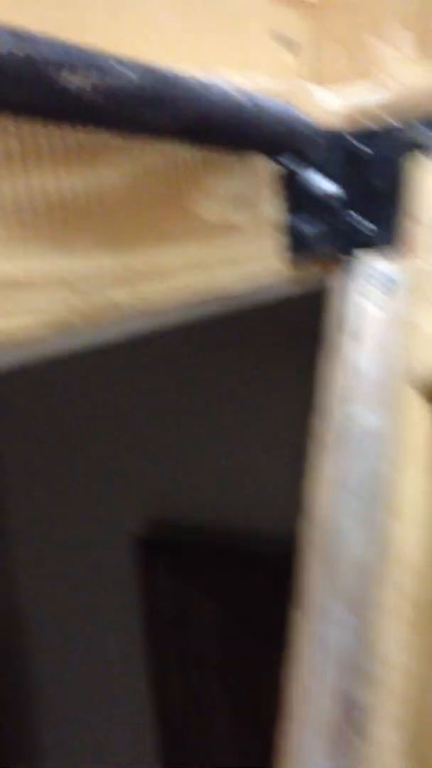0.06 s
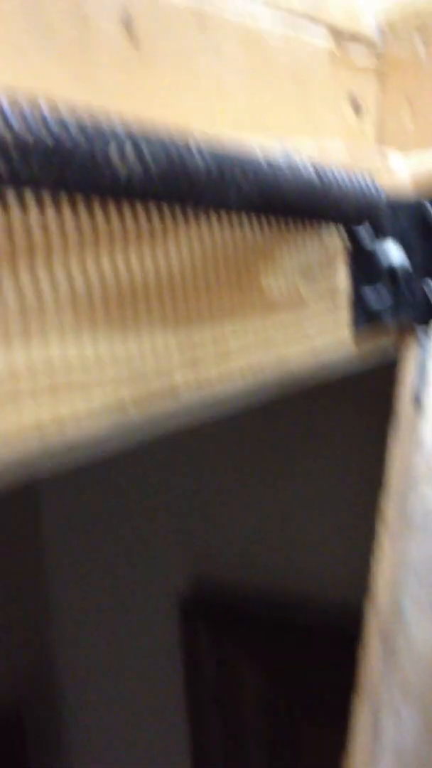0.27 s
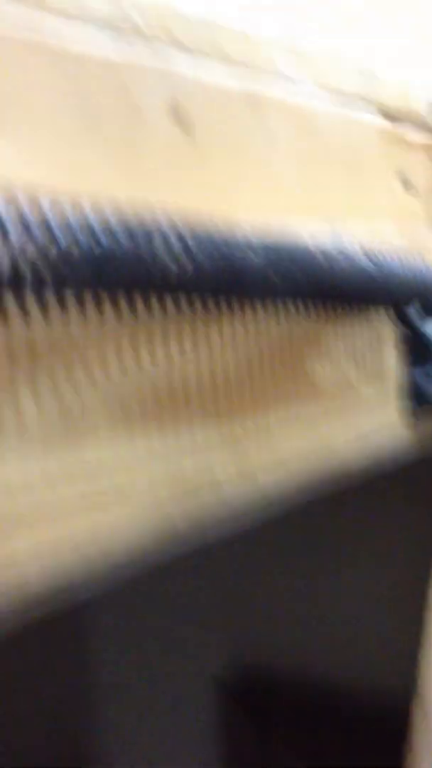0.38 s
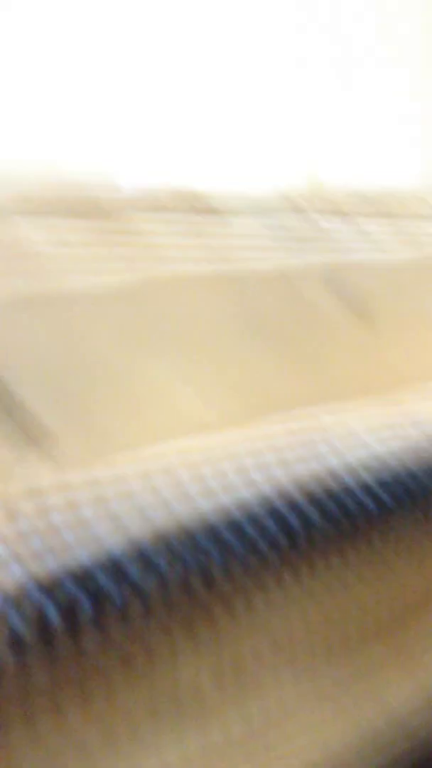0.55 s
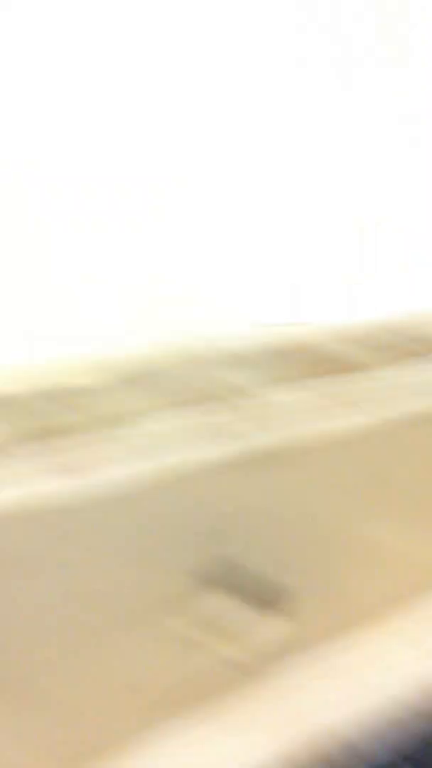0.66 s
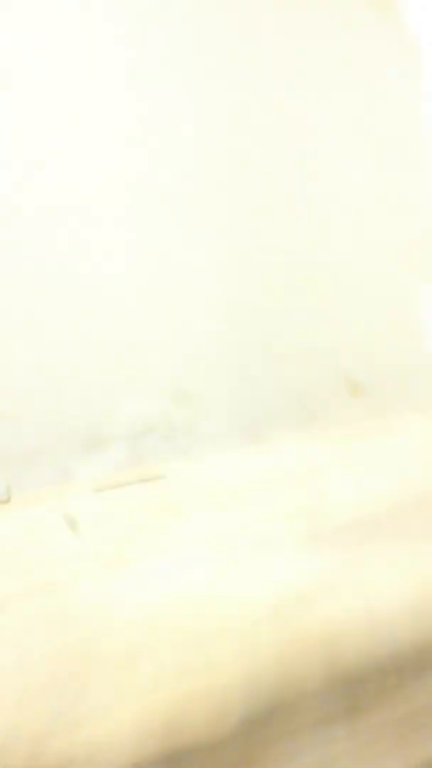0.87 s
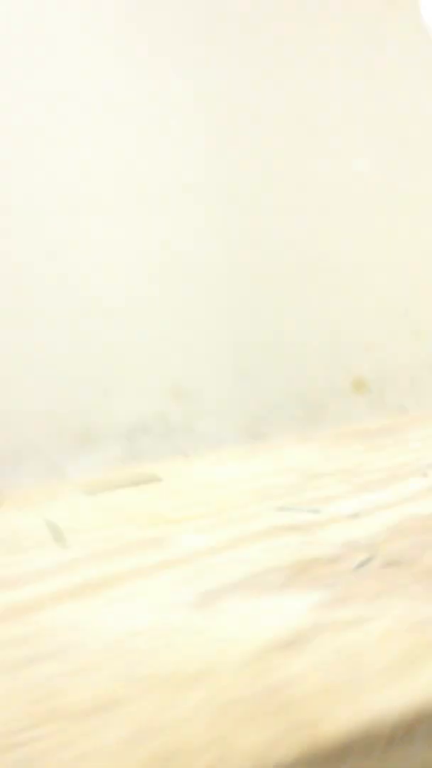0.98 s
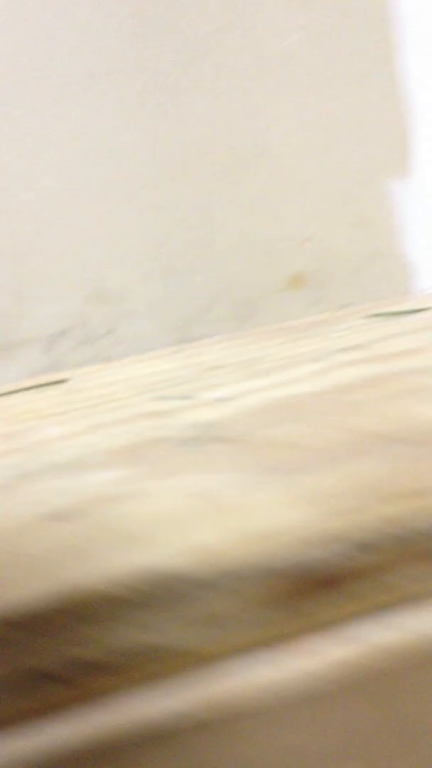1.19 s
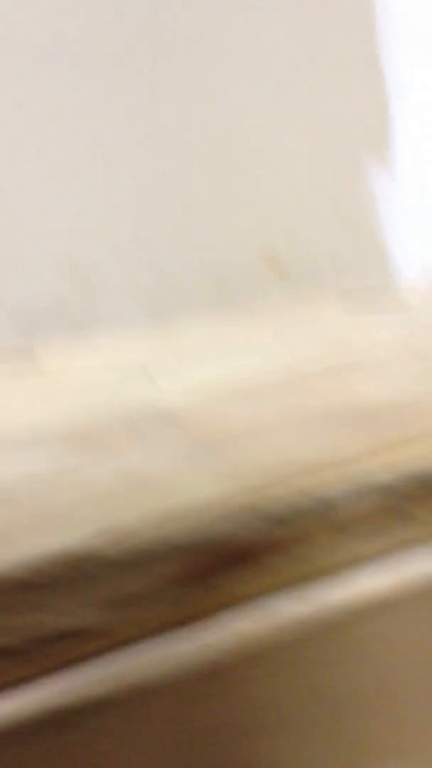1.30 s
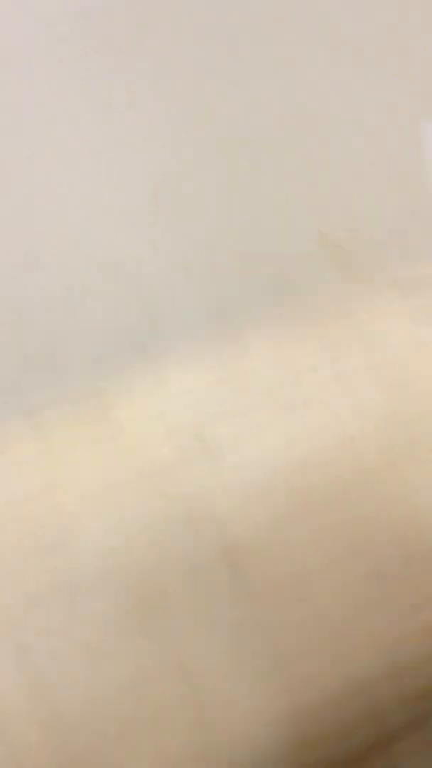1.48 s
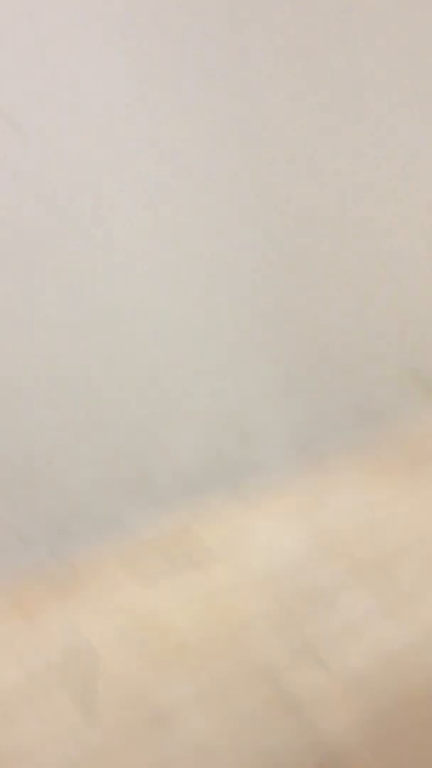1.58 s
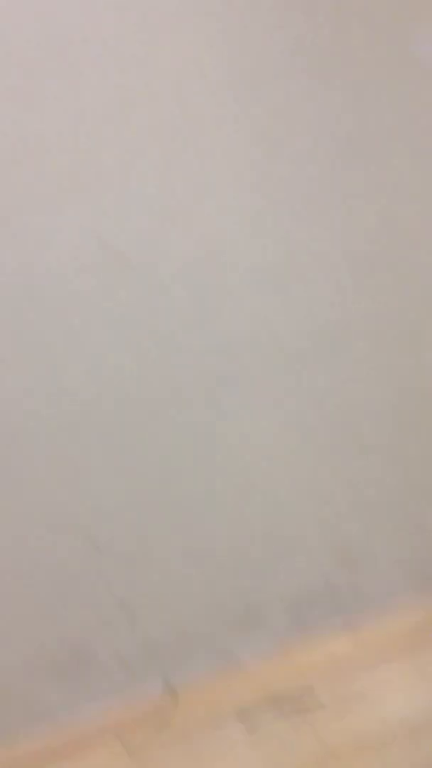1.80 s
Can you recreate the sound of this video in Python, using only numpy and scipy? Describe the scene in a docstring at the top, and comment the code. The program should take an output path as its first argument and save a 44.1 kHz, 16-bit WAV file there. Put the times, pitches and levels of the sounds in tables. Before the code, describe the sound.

A wooden door clatters close by in a small, quiet room. Dull thuds start at 0.2 seconds, then knocks and metal clicks run from 0.4 to 0.8, loudest near 0.6, where a bracket squeaks briefly. The door's coil spring rings on with a wavering metallic tone. More thuds come at 1.2 seconds, followed by softer rattling knocks until 1.5, and the spring's ring slowly fades.

```python
"""A wooden door on a long coil spring is moved twice, close by, in a small room.
Each move opens with dull thuds of the timber; then the door knocks and chatters in its frame.
Metal fittings click as they take up their play, and a bracket sings briefly as it slips.
The knocks set the spring ringing: a dense wash below 2 kHz, with clear wavering modes on top,
that hangs on between the moves."""
import sys
import numpy as np
from scipy import signal
from scipy.fft import rfft, irfft, next_fast_len
from scipy.io import wavfile

SR = 44100
rng = np.random.default_rng(int(sys.argv[2]) if len(sys.argv) > 2 else 0)


def wrap_up_sound(samples):
    """Save the sound to the file named by the first command line argument, as 16-bit audio."""
    columns = np.atleast_2d(samples).T
    # keep every value between -1 and 1, then stretch to whole-number steps
    tamed = np.clip(columns, -1, 1)
    steps = np.round(tamed * 32767).astype(np.int16)
    wavfile.write(sys.argv[1], SR, steps)


N = 81585

# colour of the room tone: (frequency [Hz], relative level [dB])
AIR_COLOUR = [(25, 27), (60, 4), (150, 19), (300, 20.5), (1000, 12), (2200, -1), (5000, -3), (9000, -5),
              (15000, -10.5)]
# slow swell of the room tone: (time [s], boost [dB])
AIR_SWELL = [(0, 6), (.16, 1.5), (1.15, 0.5), (1.85, 3.5)]
# colour of the spring's wash: (frequency [Hz], relative level [dB])
SPRING_COLOUR = [(50, -47), (130, 2.5), (250, -2.5), (550, -1), (900, 0), (1350, 5), (1900, 0)]
# top of the wash that each strike point excites: {place: frequency [Hz]}
SPRING_EDGE_HZ = {"catch": 1750, "stop": 1700, "frame": 1470}
# clicks of the fittings: (time [s], level [dB], tilt [dB/octave])
CLICKS = [(0.072, -49.5, 6), (.306, -50, 0.5), (0.321, -48.5, 3.5), (0.363, -41, 3), (0.371, -31, 3.5),
          (0.462, -43, 4.5), (0.472, -36.5, 2), (0.562, -29, 3), (0.576, -23, -3.5), (0.655, -37, 7),
          (.662, -24, -4), (0.734, -27.5, -1.5), (0.826, -35.5, 10), (1.301, -39.5, -8.5), (1.312, -34, -3),
          (1.363, -44, 10), (1.383, -40, 11), (1.497, -44.5, 5)]
# colour of a click: (frequency [Hz], relative level [dB])
METAL_COLOUR = [(300, -0.5), (1500, 16.5), (4000, 11.5), (7500, 5.5), (10000, -2), (15000, -12.5)]
# tail of a click: (frequency [Hz], t60 [s])
METAL_T60 = [(1000, 0.64), (14000, 0.21)]
# thuds of the timber: (time [s], level [dB], pitch [Hz])
THUDS = [(.213, -26.5, 204.4), (0.251, -31.5, 222.4), (0.285, -38, 219), (0.309, -39.5, 210),
         (0.410, -33.5, 240), (0.574, -31, 158.8), (0.69, -25.5, 209.6), (0.725, -31, 154),
         (.738, -29, 264), (1.172, -39, 167), (1.234, -25.5, 180), (1.249, -29.5, 203), (1.286, -31, 274),
         (1.315, -30, 252), (1.362, -41, 128), (1.394, -34, 353)]
# door knocks: (time [s], level [dB], tilt [dB/octave], chatter length [s], ring send [dB], place)
KNOCKS = [(.370, -27.5, 0.5, 0.0016, -30.5, "catch"), (.472, -35.5, 0.5, 0.02, -36.5, "catch"),
          (0.5764, -22.5, 2.5, 0.0004, -32.5, "stop"), (.630, -31.5, 0, 0.02, -40, "stop"),
          (.660, -27, 2, 0.048, -38, "stop"), (.731, -35, -5, .01, -44.5, "stop"),
          (1.311, -44.5, 3, 0.0026, -62, "frame"), (1.363, -30.5, 0, 0.00091, -39.5, "frame"),
          (1.376, -28.5, -0.5, 0.033, -34, "frame"), (1.499, -32.5, -.5, 0.031, -34, "frame")]
# colour of a knock: (frequency [Hz], relative level [dB])
DOOR_COLOUR = [(60, -43), (150, -8.5), (330, 5), (600, 1.5), (1000, 6), (1450, 1.5), (1900, -2), (2800, -3),
               (4500, -13), (8000, -19.5), (15000, -37.5)]
# tail of a knock: (frequency [Hz], t60 [s])
DOOR_T60 = [(150, 0.56), (1000, 0.71), (2500, 0.89), (5000, 0.44), (14000, 0.75)]
# where the door strikes: catch, stop, frame
PLACES = ["catch", "stop", "frame"]
# modes of spring and bracket: (pitch [Hz], t60 [s], gain from catch [dB], stop [dB], frame [dB])
MODES = [(239.7, 0.85, -6, -22, -31), (364.6, 1.3, -17.5, -8.5, -10), (477, 2.9, -40, -16.5, -19.5),
         (575, 0.84, -9, -32, -13), (628, 0.81, -25, -36, -8.5), (678.6, 1.75, -35, -22, -9.5),
         (813, 3.1, -12.5, -18, -30), (903, 1.33, -7, -9, -10.5), (1035, 1.04, -29, -34, -6.5),
         (1110, 2.05, -18.5, -10.5, -33), (1221, 0.9, -12, -6.5, -1.5), (1310, 0.38, -1, 3, -5),
         (1396, 0.81, -5, -12, -11), (1488, 2, -28, -11, -23), (1580, 1.46, -8.5, -28, -14.5),
         (1835, 1.31, -32, -7, -19.5), (1938, 0.42, -3, -6, -26), (2147, 0.51, -10, -1.5, -16),
         (2430, 0.65, -23, -7, -16), (2815, 0.3, -39, 1, -27), (3116, 0.48, -42, -7, -39),
         (3527, 0.2, -5.5, -30, -26)]
# notes of the slipping bracket: (time [s], length [s], pitch [Hz], level [dB])
BRACKET_NOTES = [(0.576, 0.07, 903, -25.5), (0.666, 0.067, 929, -26.5)]

AIR_DB, SPRING_TRIM_DB, MODES_TRIM_DB = -54.5, -4, 1
SPRING_T60_S, SPRING_ATTACK_S = 2.57, 0.0046
HIT_SAMPLES = 32768


def undb(db):
    """Decibels to gain."""
    return 10 ** (np.asarray(db) / 20)


def lookup(table, hz):
    """Read a (frequency, value) table on a log-frequency axis."""
    f, values = np.array(table, float).T
    return np.interp(np.log(hz), np.log(f), values)


def bins(size):
    """Spectrum frequencies for that many samples."""
    return np.maximum(np.arange(size // 2 + 1) * SR / size, 1)


def wash(db):
    """Countless modes with the given levels and random phases; rms 1."""
    x = irfft(undb(db) * np.exp(2j * np.pi * rng.random(len(db))))
    return x / x.std()


def fade(t, t60):
    """Exponential decay by 60 dB in t60."""
    return np.exp(-np.log(1000) * t / t60)


def add(out, start, x):
    """Mix x into out from a given time."""
    i = max(int(start * SR), 0)
    out[i:i + len(x)] += x[:N - i]


def room_tone(t):
    """A quiet bed of air, a little louder at both ends."""
    swell_db = np.interp(t, *np.array(AIR_SWELL).T)
    return undb(AIR_DB + swell_db) * wash(lookup(AIR_COLOUR, bins(N + 1)))[:N]


def spring_wash(t, t60, place):
    """The spring's crowd of close modes, rolling off steeply below 2 kHz."""
    f = bins(N + 1)
    rolloff_db = -10 * np.log10(1 + (f / SPRING_EDGE_HZ[place]) ** 24)
    return wash(lookup(SPRING_COLOUR, f) + rolloff_db)[:N] * fade(t, t60)


def neighbours(hz, spread_hz=18.2, level_db=-5):
    """Weak modes around a clear one, which beat with it and make it waver."""
    f = bins(next_fast_len(N, True))
    return undb(level_db) * wash(-20 * np.log10(1 + ((f - hz) / spread_hz) ** 2))[:N]


def lingering_ring(t, t60=3.03, wash_db=-42.5, mode_hz=825, mode_db=-48.5):
    """The spring is already ringing at the start, one wavering mode standing out."""
    mode = np.sin(2 * np.pi * mode_hz * t) + neighbours(mode_hz)
    return undb(wash_db) * spring_wash(t, t60, "catch") + undb(mode_db) * mode * fade(t, t60)


def ripple(width_hz=30.13, depth_db=3):
    """The many small resonances of one contact point, in dB over frequency."""
    bumps = np.interp(bins(HIT_SAMPLES) / width_hz, np.arange(4096), rng.standard_normal(4096))
    return depth_db * np.clip(bumps, -2, 2)


def impact(colour, ripple_db, decays, tilt, crack_s, tail_db, chatter_s=0):
    """A hard contact: a short crack, then body and room die away, each octave at its own rate."""
    f, t = bins(HIT_SAMPLES), np.arange(HIT_SAMPLES) / SR
    tilt_db = tilt * np.log2(np.maximum(f, 400) / 400)
    spectrum = rfft(wash(lookup(colour, f) + ripple_db + tilt_db))
    octave = np.clip(np.log2(f / 125), 0, 7)
    out = np.zeros(HIT_SAMPLES)
    for k in range(8):
        band = irfft(spectrum * np.maximum(1 - abs(octave - k), 0))
        envelope = np.exp(-t / crack_s) + undb(tail_db) * fade(t, lookup(decays, 125 * 2 ** k))
        out += band * (chatter(envelope, chatter_s) if chatter_s else envelope)
    return out


def fitting_clicks():
    """Metal fittings take up their play with short bright ticks."""
    out = np.zeros(N)
    for start, level_db, tilt in CLICKS:
        click = impact(METAL_COLOUR, ripple(), METAL_T60, tilt, crack_s=0.005, tail_db=-11.5)
        add(out, start, undb(level_db) * click)
    return out


def timber_thuds(attack_s=0.0031, decay_s=0.017, width_octaves=0.61):
    """Soft pushes on the timber: a few low cycles with an overtone, rumble and a faint room boom."""
    out, f, t = np.zeros(N), bins(HIT_SAMPLES), np.arange(HIT_SAMPLES) / SR
    attack, body = 1 - np.exp(-t / attack_s), np.exp(-t / decay_s)
    boom = undb(-12) * fade(t, t60=0.83)
    for start, level_db, hz in THUDS:
        phase = 2 * np.pi * hz * t
        tone = np.sqrt(2) * (np.sin(phase) + undb(-11) * np.sin(2.3 * phase))
        hump = np.exp(-.5 * (np.log2(f / hz) / width_octaves) ** 2)
        skirts = undb(-18) * f * hz / (f ** 2 + hz ** 2)
        rumble = wash(20 * np.log10(hump + skirts)) * (undb(-5) * body + boom)
        add(out, start, undb(level_db) * attack * (tone * body + rumble))
    return out


def chatter(envelope, length_s):
    """Smear an envelope over a run of tiny contacts; their energies add up."""
    count = max(int(length_s * SR), 1)
    energy = signal.fftconvolve(envelope ** 2, np.ones(count) / count)[:len(envelope)]
    return np.sqrt(np.maximum(energy, 0))


def ring_attack(t, chatter_s):
    """The ring builds for as long as the door chatters."""
    return chatter(1 - np.exp(-t / SPRING_ATTACK_S), chatter_s)


def door_knocks(t):
    """The door hits catch, stop or frame, each with its own colour, and shakes the spring."""
    out, ripples = np.zeros(N), {place: ripple() for place in PLACES}
    for start, level_db, tilt, chatter_s, send_db, place in KNOCKS:
        knock = impact(DOOR_COLOUR, ripples[place], DOOR_T60, tilt,
                       crack_s=0.022, tail_db=-8.5, chatter_s=chatter_s)
        add(out, start, undb(level_db) * knock)
        ring = spring_wash(t, SPRING_T60_S, place) * ring_attack(t, chatter_s)
        add(out, start, undb(send_db + SPRING_TRIM_DB) * ring)
    return out


def metal_clang(t):
    """Each knock feeds the clear modes according to where it lands; each fades at its own rate."""
    out = np.zeros(N)
    attacks = [ring_attack(t, chatter_s) for _, _, _, chatter_s, _, _ in KNOCKS]
    for hz, t60, *gains_db in MODES:
        energy, decay = np.zeros(N), fade(t, t60)
        for (start, *_, send_db, place), attack in zip(KNOCKS, attacks):
            drive = undb(send_db + gains_db[PLACES.index(place)])
            add(energy, start, (drive * attack * decay) ** 2)
        tone = np.sin(2 * np.pi * (hz * t + rng.random())) + neighbours(hz)
        out += np.sqrt(energy) * tone
    return undb(MODES_TRIM_DB) * out


def bracket_notes():
    """The bracket slips under load: a clear note that swells fast and chokes as the slip ends."""
    out = np.zeros(N)
    for start, length_s, hz, level_db in BRACKET_NOTES:
        t = np.arange(int(length_s * SR)) / SR
        envelope = np.sqrt(np.sin(np.pi * t / length_s)) * fade(t, t60=1)
        add(out, start, undb(level_db) * envelope * np.sin(2 * np.pi * hz * t))
    return out


def scene():
    """Door, spring and fittings over the room tone, in mono."""
    t = np.arange(N) / SR
    bed = room_tone(t) + lingering_ring(t)
    door = timber_thuds() + door_knocks(t)
    metal = metal_clang(t) + bracket_notes() + fitting_clicks()
    return (bed + door + metal)[None]


def record(dry):
    """A small microphone loses the deep bass; a steep high cut takes off the very top."""
    low_cut = signal.butter(4, 69, "high", fs=SR, output="sos")
    high_cut = signal.ellip(10, .2, 80, 15150, fs=SR, output="sos")
    return signal.sosfilt(high_cut, signal.sosfilt(low_cut, dry))


dry = scene()
out = record(dry)
wrap_up_sound(out)
```